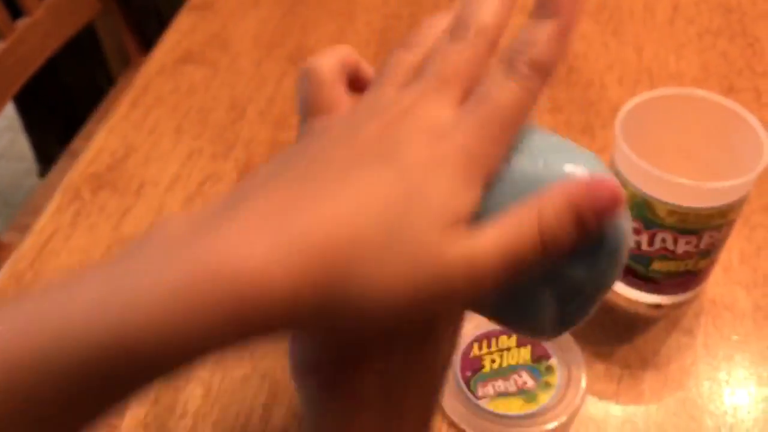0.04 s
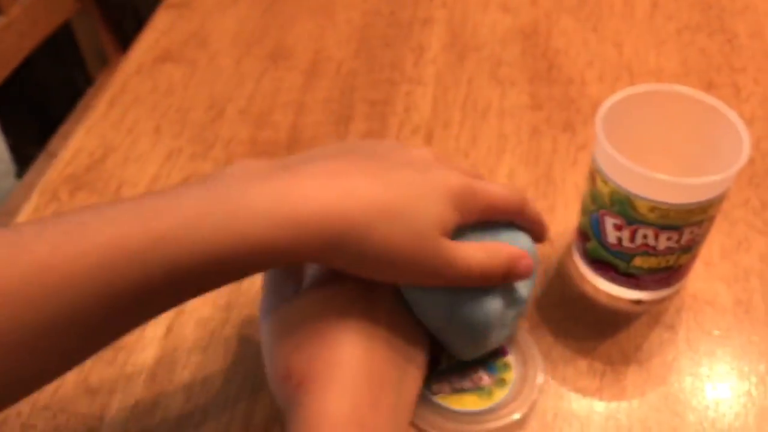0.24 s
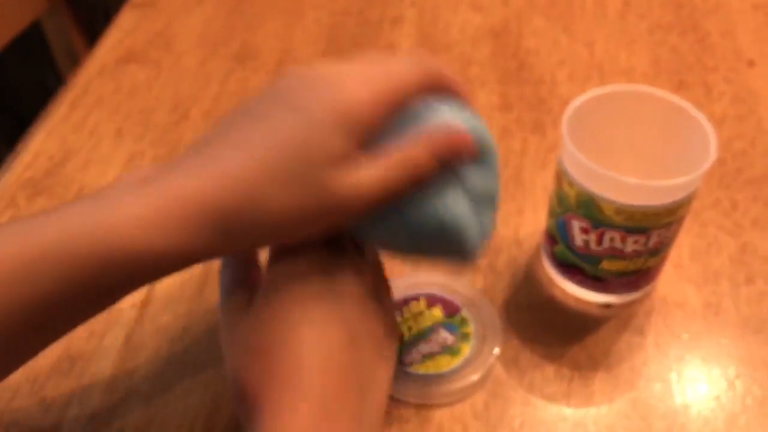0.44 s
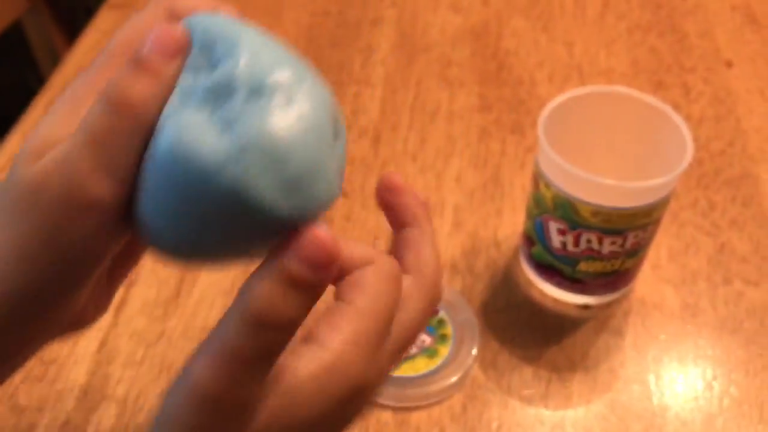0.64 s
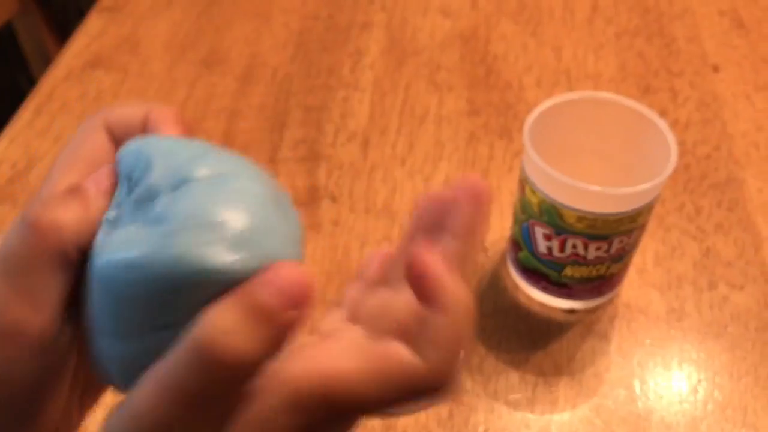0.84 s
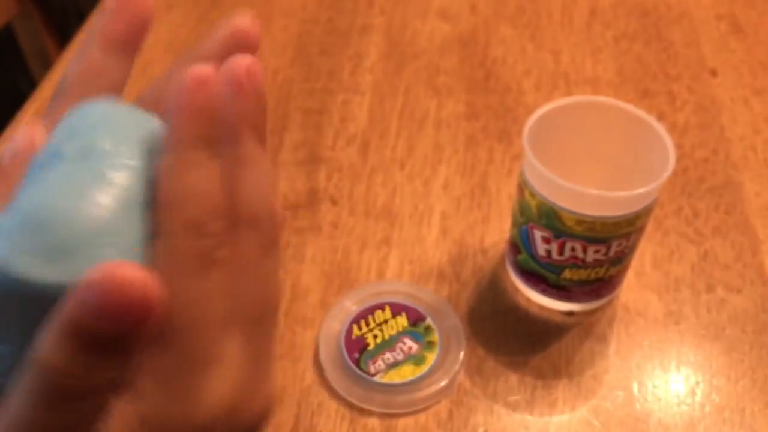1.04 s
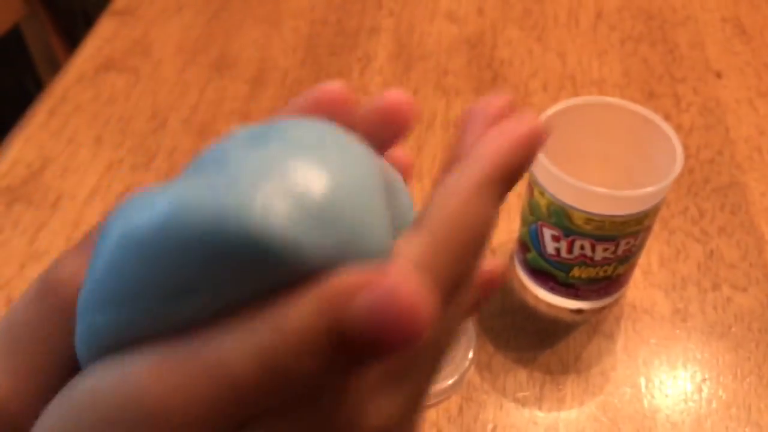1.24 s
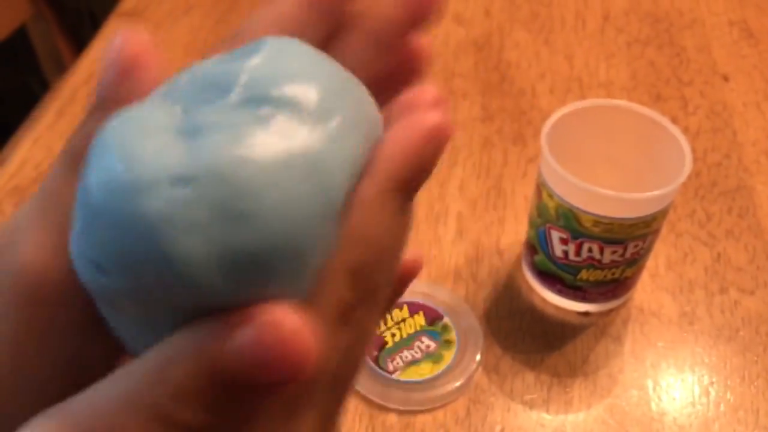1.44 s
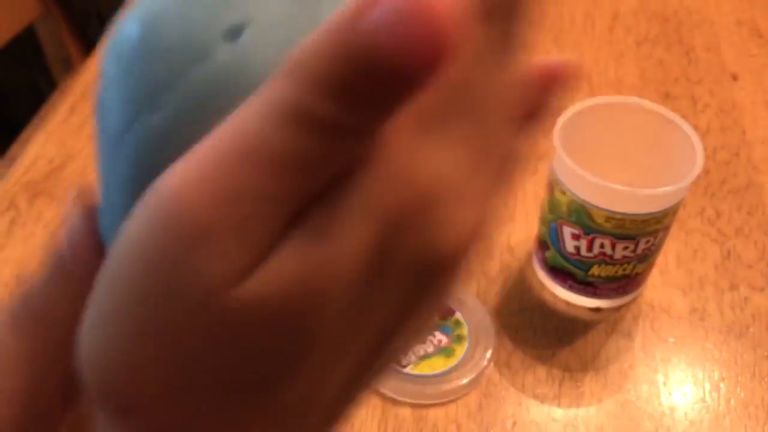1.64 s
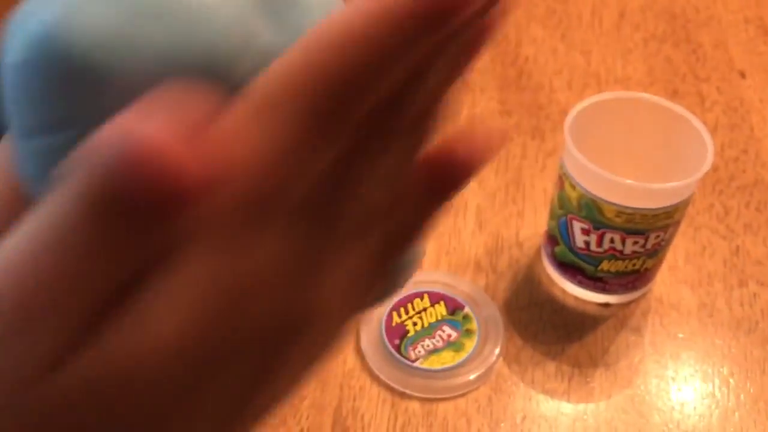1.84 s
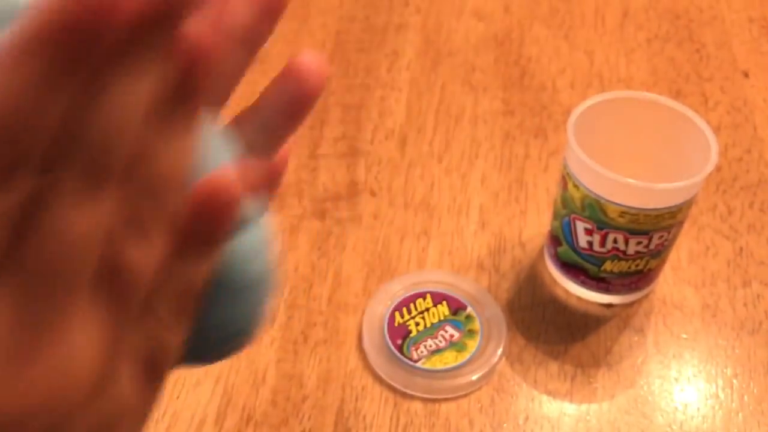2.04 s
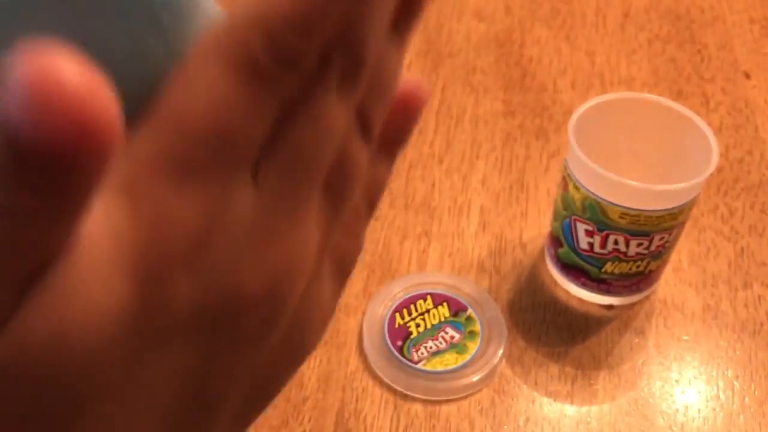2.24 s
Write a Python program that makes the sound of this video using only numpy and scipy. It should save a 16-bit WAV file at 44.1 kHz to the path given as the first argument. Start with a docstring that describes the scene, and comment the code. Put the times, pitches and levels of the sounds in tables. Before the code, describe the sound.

Putty smacks a wooden tabletop with a wet thud, followed by quiet sticky handling.

```python
"""A small room with a low hum, where a lump of soft putty is slapped onto a wooden table.
The impact gives a wet crack, the air trapped under the lump resonates with a hollow pop, and the
modes of the table top add a low thud. The putty is dragged off the wood and patted from hand to
hand: stick-slip friction makes it rustle, and tiny air pockets crackle as they burst.
Nearby surfaces reflect the slap, and a short reverberation follows slap and handling."""
import sys
import numpy as np
from scipy import signal
from scipy.fft import rfft, irfft
from scipy.io import wavfile

SR = 44100
rng = np.random.default_rng(int(sys.argv[2]) if len(sys.argv) > 2 else 0)


def to_wav(sig):
    """Store sig (one row per channel, or 1-D mono) as 16-bit WAV at the path in sys.argv[1].

    Samples outside -1..1 are clipped; the rate is SR.
    """
    pcm = np.clip(np.atleast_2d(sig), -1, 1) * 32767
    pcm = np.round(pcm).astype(np.int16)
    wavfile.write(sys.argv[1], SR, pcm.T)  # frames by channels


N = 101429
T = np.arange(N) / SR
FREQS = np.maximum(np.fft.rfftfreq(N, 1 / SR), 1)
SLAP_S, TOP_HZ = .2254, 18000


def undb(db):
    """Decibels to amplitude ratio."""
    return 10 ** (np.asarray(db) / 20)


def unit(x):
    """Normalisation to rms 1."""
    return x / np.sqrt(np.mean(x ** 2) + 1e-30)


def lookup(points, hz):
    """Interpolation of (frequency_hz, value) points on a log-frequency axis."""
    f, v = np.array(points).T
    return np.interp(np.log(hz), np.log(f), v)


def shape(x, gain):
    """Zero-phase filtering by a gain for each frequency."""
    return irfft(rfft(x) * gain, N)


def fade(t, t60):
    """Exponential decay from t = 0, by 60 dB in t60 seconds."""
    return (t >= 0) * np.exp(-np.log(1000) * np.maximum(t, 0) / t60)


def ring(start, hz, t60, attack_s):
    """Damped oscillation of one mode."""
    t = np.maximum(T - start, 0)
    return np.sin(2 * np.pi * hz * t) * fade(t, t60) * (1 - np.exp(-t / attack_s))


def convolve(x, response):
    """Convolution with an impulse response."""
    return signal.fftconvolve(x, response)[:N]


def butter(x, hz, kind, order=2):
    """Causal low- or high-pass filtering."""
    return signal.sosfilt(signal.butter(order, hz, kind, fs=SR, output="sos"), x)


def background():
    """Ambient noise: a broadband floor, and narrow bands whose random beating makes a wavering hum."""
    # floor spectrum: frequency_hz, relative_db
    floor_colour = [(25, -7.5), (45, 2), (90, -1), (170, 0.5), (260, -7.5), (400, -11), (550, -17),
                    (850, -18), (1300, -21.5), (1650, -19.5), (2200, -25), (2800, -27.5), (3800, -30),
                    (6000, -33), (10000, -38), (13000, -35), (17500, -44)]
    # hum bands: centre_hz, level_db, width_hz
    hum_bands = [(53.5, -64.5, 12), (124.4, -62.5, 14.7), (214.7, -71.5, 12), (395.7, -77, 12)]
    floor = unit(shape(rng.standard_normal(N), undb(lookup(floor_colour, FREQS))))
    hum = 0
    for hz, db, width in hum_bands:
        peak = 1 / (1 + (2 * (FREQS - hz) / width) ** 2)
        hum += undb(db) * unit(shape(rng.standard_normal(N), peak))
    return undb(-58) * floor + hum


def room(gain, onset_s=.0032):
    """Diffuse reverberation: each band decays exponentially, the midrange most slowly."""
    # reverberation times: frequency_hz, t60_s
    decay_times = [(100, 0.245), (1200, 0.54), (4000, 0.43), (9000, 0.41), (17000, 0.38)]
    centres = np.geomspace(60, 18000, 12)
    noise = shape(rng.standard_normal(N), gain)
    tail = 0
    for hz, share in zip(centres, np.eye(len(centres))):
        band = shape(noise, np.interp(np.log(FREQS), np.log(centres), share))
        tail += band * fade(T, lookup(decay_times, hz))
    build_up = 1 - np.exp(-(T / onset_s) ** 2)
    return tail * build_up * np.sqrt(28 / SR)


def slap_reverberation():
    """The slap radiates in all directions and excites the diffuse field with its spectrum."""
    # radiated spectrum: frequency_hz, relative_db
    colour = [(100, 8), (450, -9.5), (720, -3), (1000, -4), (1280, 5), (1500, -3.5), (2100, -2), (2500, -5),
              (3200, -3.5), (4200, -6.5), (6000, -10.5), (8300, -12.5), (10000, -21.5), (13000, -22.5),
              (18000, -40)]
    tail = undb(4.5) * room(undb(lookup(colour, FREQS)))
    return np.pad(tail, (int(SLAP_S * SR), 0))[:N]


def echoes(sound):
    """Early reflection: nearby surfaces return delayed, duller copies."""
    # reflection paths: delay_s, gain_db
    paths = [(.0082, -20), (.0098, -18), (0.0153, -18)]
    reflected = sum(undb(db) * np.interp(T - delay, T, sound, left=0) for delay, db in paths)
    return butter(reflected, 4000, "low", order=1)


def blisters(per_s=300, centre_hz=7900, spread_octaves=.63, t60_cycles=13):
    """Tiny wet blisters open at random, each a damped oscillator of its own pitch and strength."""
    out, t = np.zeros(N + 256), T[:256]
    for place, pitch, size in rng.random((int(per_s * N / SR), 3)):
        hz = centre_hz * 2 ** (spread_octaves * (2 * pitch - 1))
        start = int(place * N)
        out[start:start + len(t)] += size ** 2 * np.sin(2 * np.pi * hz * t) * fade(t, t60_cycles / hz)
    return unit(out[:N])


def stroke(peak_s, rise_s, fall_s, db, colour, tilt_db=0, wet=0, slips_per_s=7000):
    """Stick-slip friction: dense random impulses merge into a noise that swells and dies away."""
    slips = (rng.random(N) < slips_per_s / SR) * rng.choice([-1, 1], N)
    strength = undb(3.5 * np.minimum(rng.exponential(size=N), 4))
    spectrum = undb(lookup(colour, FREQS) + tilt_db * np.log2(FREQS))
    rustle = unit(shape(slips * strength, spectrum))
    width_s = np.where(T < peak_s, rise_s, fall_s)
    swell = np.exp(-(np.abs(T - peak_s) / width_s) ** 1.52 / 2)
    return undb(db) * swell * (rustle + wet)


def drags():
    """Dry friction: putty and fingers slide on the wood."""
    # slides: peak_s, rise_s, fall_s, level_db
    slides = [(0.011, 0.0066, 0.0046, -54.5), (0.11, 0.0094, 0.014, -51), (0.414, 0.021, 0.03, -55.5),
              (.461, 0.014, .011, -52)]
    # friction spectrum on wood: frequency_hz, relative_db
    colour = [(300, -29), (700, -2), (1600, -9), (2200, 0), (2900, -9), (3600, 0.5), (4250, 1.5),
              (5200, -8.5), (7000, -15.5), (8300, -11.5), (11000, -24.5), (18000, -30)]
    return sum(stroke(*slide, colour) for slide in slides)


def rubs():
    """Moist friction: skin slides on the putty and opens blisters as it goes."""
    # slides: peak_s, rise_s, fall_s, level_db, tilt_db_per_octave
    slides = [(.008, 0.015, 0.029, -60, -1), (.109, 0.012, 0.0089, -50.5, -.5),
              (.149, 0.0081, 0.0074, -60.5, -1), (.525, .02, 0.018, -64, -4),
              (.637, 0.031, 0.014, -63, -0.5), (.685, 0.012, 0.023, -65.5, 0),
              (.852, 0.028, 0.024, -66.5, 2.5), (1.002, 0.0087, 0.009, -66.5, 3),
              (1.06, 0.021, 0.022, -67, -3.5), (1.121, .006, 0.016, -66, 2.5),
              (1.195, 0.021, 0.023, -68.5, -1), (1.339, 0.021, 0.02, -57, -1.3),
              (1.435, 0.015, 0.013, -65.5, 0), (1.525, 0.013, 0.014, -55, 1.8),
              (1.674, 0.033, 0.022, -55, -0.5), (1.809, 0.013, 0.025, -54, 0.3),
              (1.834, 0.011, 0.015, -53.5, 1.8), (1.95, 0.026, 0.038, -62.5, 2.6),
              (2.128, 0.034, 0.029, -66.5, -1), (2.19, 0.019, .025, -67.5, -2.5),
              (2.283, 0.029, 0.023, -64, 1.5)]
    # friction spectrum of skin: frequency_hz, relative_db
    colour = [(250, -30), (600, 1), (1200, 4.5), (1900, -1.5), (2600, -1), (4200, -1.5), (6000, -1.5),
              (8200, -2), (11000, -7.5), (18000, -11)]
    wet = undb(-9) * blisters()
    return sum(stroke(*slide, colour, tilt_db, wet) for *slide, tilt_db in slides)


def pops(clicks_per_s=1800):
    """Cavity resonance: each air pocket opens in a short run of clicks that set it ringing."""
    # pockets bursting and sticky skin peeling: start_s, length_s, level_db, pitch_hz, t60_cycles
    bursts = [(0.013, 0.0053, -52.5, 4200, 14), (.103, .002, -46.5, 4460, 9), (0.106, 0.012, -53, 4340, 21),
              (0.42, .007, -53.5, 1630, 22), (.483, .001, -48.5, 1140, 11.4), (.484, .002, -55, 1800, 20),
              (0.812, 0.0038, -58, 10900, 3), (.819, 0.0015, -50.5, 14300, 5.7),
              (0.821, .014, -63, 6840, 13), (1.111, 0.0051, -59.5, 5800, 7), (1.131, 0.012, -63, 6740, 10),
              (1.646, .002, -51.5, 4440, 17), (1.701, 0.0043, -56, 12000, 3),
              (1.521, .008, -56.5, 5200, 13), (1.8, .006, -56, 1890, 7.2), (2.0895, .0035, -47.5, 7000, 13),
              (2.0941, 0.0006, -37, 8740, 8), (2.096, 0.00095, -39.5, 9300, 3.4),
              (2.243, 0.0039, -56, 14800, 9.7), (2.247, .002, -64, 1270, 12), (2.263, .002, -50, 6500, 11),
              (2.2632, .002, -49.5, 11500, 4)]
    out = np.zeros(N)
    for start, length, db, hz, cycles in bursts:
        count = 1 + int(length * clicks_per_s)
        jitter, size = rng.random((count, 2)).T
        click_s = start + length * (np.arange(count) + jitter) / count
        clicks = np.bincount((click_s * SR).astype(int), .5 + size, N)[:N]
        t60 = cycles / hz
        cavity = convolve(clicks, ring(0, hz, t60, attack_s=.5 / hz))
        pop = unit(butter(cavity, .61 * hz, "high", order=3))
        out += undb(db) * pop * np.sqrt((length + t60 / 2) * SR / N)  # rms over the pop's own duration
    return out


def table_top(attack_cycles=1.45):
    """Modal vibration: the soft impact sets the wooden top ringing with a gradual onset."""
    # wood modes: pitch_hz, level_db, t60_s
    modes = [(72.4, -36, 0.25), (132.3, -45.5, 0.38), (213, -52, 0.29), (345, -66, 0.058),
             (480, -37, 0.033), (676, -52, 0.29), (833, -46.5, 0.29), (1229, -36.5, 0.14),
             (1742, -43, 0.17), (2200, -49, 0.34), (2850, -50.5, 0.35)]
    return sum(undb(db) * ring(SLAP_S, hz, t60, attack_cycles / hz) for hz, db, t60 in modes)


def slap():
    """Impulse excitation: the putty lands with a wet crack, and the trapped air rings briefly."""
    # resonances of the air under the lump, and in the last row the brief broadband ring of the crack: pitch_hz,
    # relative_db, t60_s, delay_s
    modes = [(720, -22.5, 0.0088, 0.0019), (1300, -8, 0.011, 0.001), (1795, -6, 0.0056, 0.00079),
             (2980, -14.5, 0.0073, 0), (3576, -15, 0.0071, 0.0018), (4510, -23, 0.0065, 0),
             (5220, -14.5, 0.0031, 0.0019), (6530, -17, 0.0044, 0), (8240, -16, 0.0052, 0),
             (7650, 1, 0.00049, .0001)]
    ringing = sum(undb(db) * ring(SLAP_S + delay, hz, t60, attack_s=.0001) for hz, db, t60, delay in modes)
    burst = rng.standard_normal(N) * fade(T - SLAP_S, t60=.015)
    crack = butter(burst, 7040, "low", order=1)
    impact = undb(-1) * ringing + undb(-24.5) * crack
    return butter(impact, 504, "high")  # so small a source radiates little bass


def scene():
    """Superposition of direct sound, early reflections, reverberation and ambient noise."""
    hit = slap()
    handling = drags() + rubs() + pops()
    reverberation = slap_reverberation() + undb(-12.5) * convolve(handling, room(gain=.86))
    return (hit + table_top() + handling + echoes(hit) + reverberation + background())[None]


def record(dry):
    """Band limiting: the microphone drops the deepest bass and the highest treble."""
    treble_cut = signal.ellip(10, .2, 70, TOP_HZ, fs=SR, output="sos")
    return signal.sosfilt(treble_cut, butter(dry, 38.6, "high", order=4))


dry = scene()
out = record(dry)
to_wav(out)
```